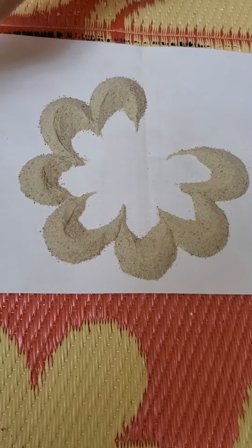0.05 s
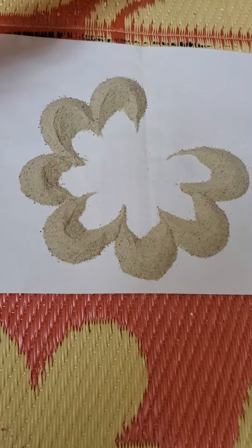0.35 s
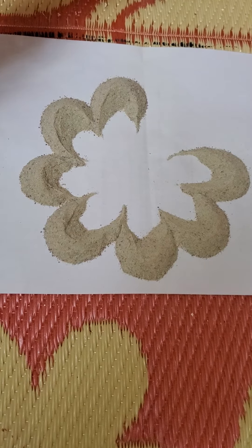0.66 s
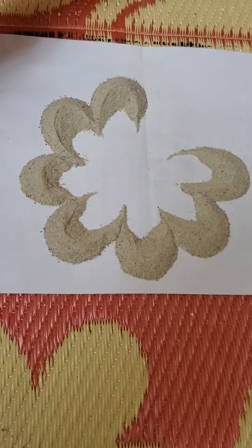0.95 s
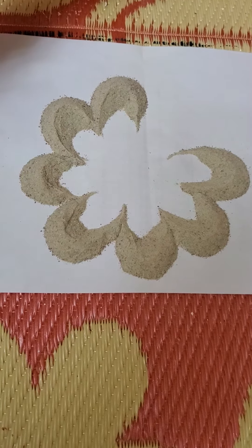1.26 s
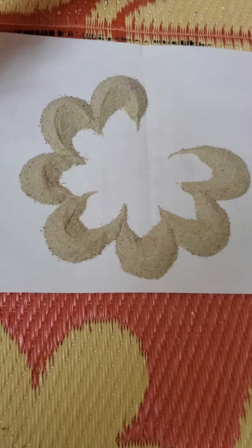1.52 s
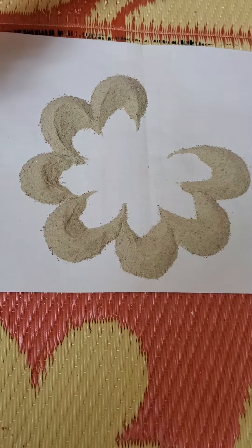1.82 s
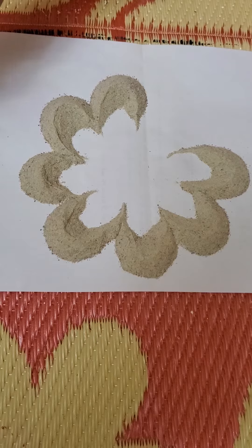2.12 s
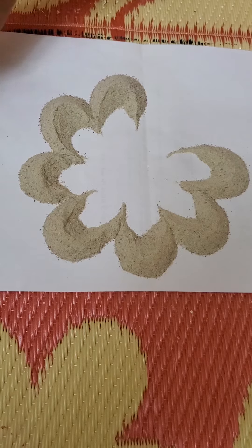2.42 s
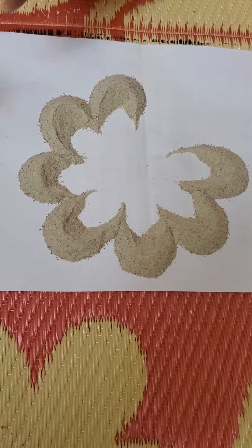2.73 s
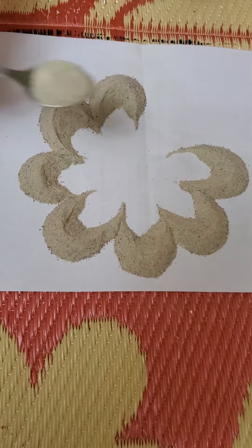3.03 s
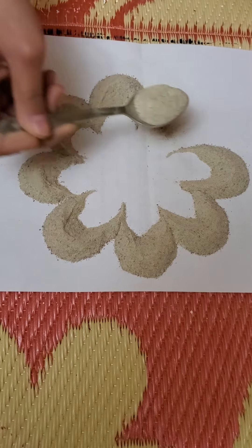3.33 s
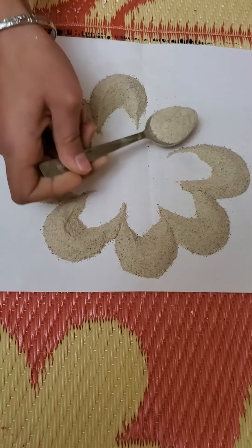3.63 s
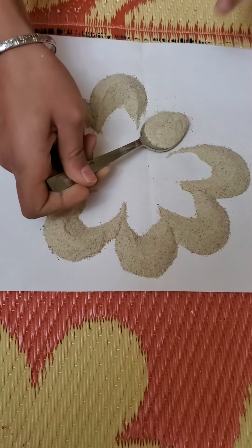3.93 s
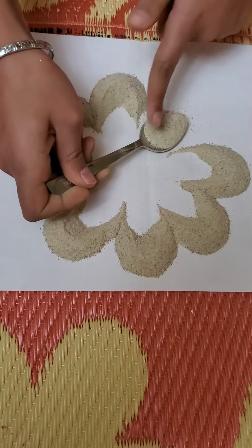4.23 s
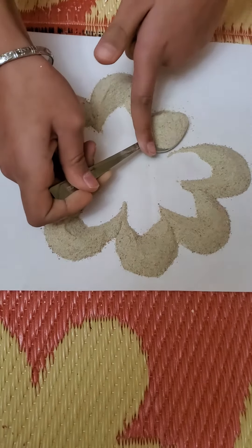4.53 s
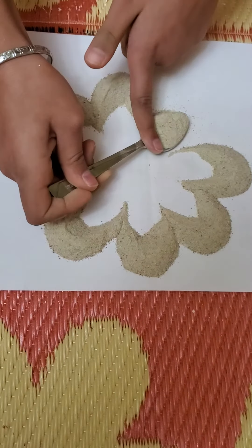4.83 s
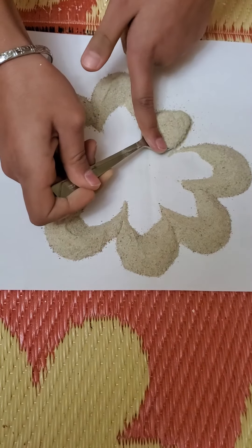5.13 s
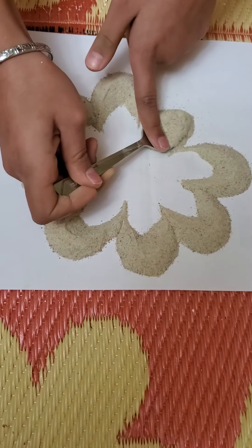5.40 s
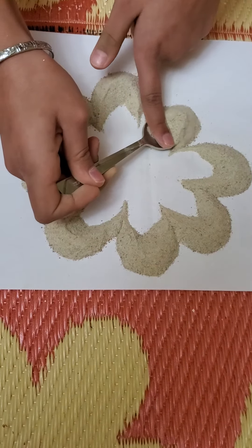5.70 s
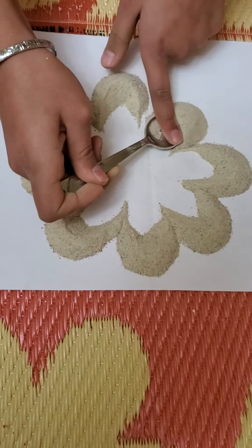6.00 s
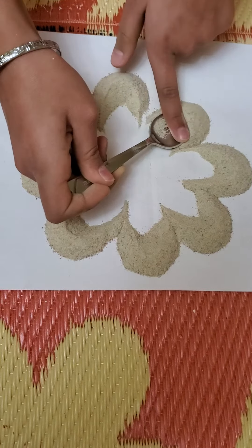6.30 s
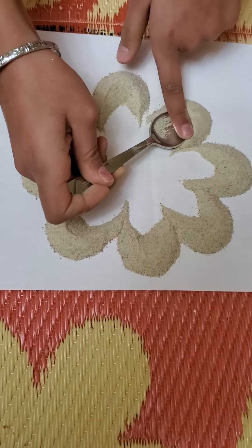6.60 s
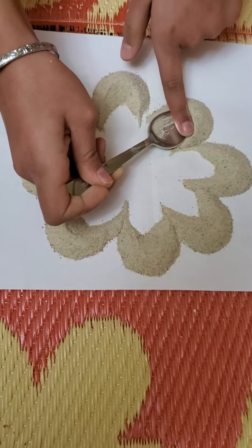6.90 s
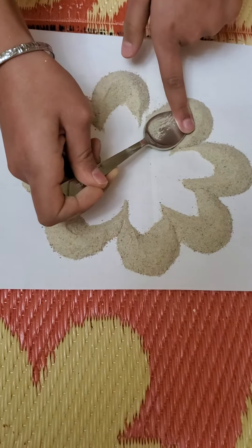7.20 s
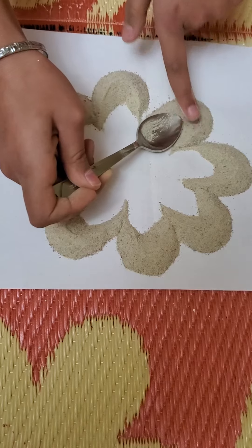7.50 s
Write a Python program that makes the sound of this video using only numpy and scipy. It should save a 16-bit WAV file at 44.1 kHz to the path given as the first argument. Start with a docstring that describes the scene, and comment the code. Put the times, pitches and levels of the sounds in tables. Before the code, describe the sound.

A steel spoon crunches through sand in a bowl, then sand spills and slides onto paper with soft hisses and ticks.

```python
"""A steel spoon digs in a bowl of fine sand: each stroke shears grains, which crunch and ring the bowl.
Something bumps and drags softly on the floor mat, and an arm brushes it. The spoon then spills sand
on a sheet of paper and a fingertip pushes the rest off it: sliding grains hiss, single impacts tick.
A bare room with a low rumble surrounds it all, heard from close by through two microphone ports."""
import sys
import numpy as np
from scipy import signal
from scipy.fft import rfft, irfft
from scipy.io import wavfile

SR = 44100
rng = np.random.default_rng(int(sys.argv[2]) if len(sys.argv) > 2 else 0)


def int16_out(signal):
    """Quantize to a 16-bit WAV file."""
    q = np.round(np.clip(np.atleast_2d(signal).T, -1, 1) * 32767)
    wavfile.write(sys.argv[1], SR, q.astype(np.int16))


N = 332955
TIME = np.arange(N) / SR

# Levels in the tables are relative; a balance is left minus right.
# noise spectrum of the still room at each port: (frequency [Hz], level [dB])
AMBIENT_LEFT = [(25, -11.5), (50, 0), (140, -2.5), (250, 1), (310, -17.5), (480, -22), (600, -15),
                (900, -27.5), (2000, -33.5), (5500, -44.5), (6900, -26.5), (8500, -43.5), (15500, -33.5)]
AMBIENT_RIGHT = [(25, -17), (50, 2.5), (250, -2.5), (420, -24), (850, -31), (1800, -16.5), (3100, -40.5),
                 (4000, -23.5), (4700, -29), (5600, -24.5), (8500, -48), (11000, -33.5), (15500, -55)]
# strength of that noise: (left level [dB], right level [dB])
AMBIENT_DB = [-64, -61.5]
# reverberation of the room: (frequency [Hz], t60 [s])
REVERB_TIMES = [(100, 0.81), (1000, 0.58), (4000, 0.39), (12000, 0.48)]
# how sound from the bowl and from the sheet divides between the ports: (frequency [Hz], balance [dB])
BOWL_BALANCE = [(60, -4.5), (200, -2), (320, -6), (480, 0.5), (750, 3.5), (1300, -0.5), (1700, -8.5),
                (2400, -3.5), (4400, -7), (6800, 5), (8500, 1.5), (10500, -4), (12500, 3.5), (15000, 16)]
PAPER_BALANCE = [(400, -14), (700, 21), (1700, -15.5), (2600, -8), (3400, -2.5), (4600, -4.5),
                 (5600, -10.5), (7000, 5.5), (9000, 8), (11000, 6), (14000, 13.5)]

# an arm brushes the mat as each hand reaches in: (time [s], duration [s], level [dB])
ARM_REACHES = [(3.139, 0.094, -69.5), (4.043, 0.09, -70), (4.277, 0.055, -72)]
# something is dragged over the mat: (time [s], duration [s], level [dB])
MAT_DRAGS = [(1.874, 0.055, -66.5), (2.193, 0.076, -73.5), (2.26, 0.088, -70.5), (2.319, 0.18, -55.5)]
# soft bumps on the mat: (time [s], thud level [dB], knock level [dB])
MAT_BUMPS = [(1.206, -43, -62), (1.247, -45.5, -66), (1.405, -43, -65), (2.323, -31.5, -44),
             (2.511, -44, -45), (3.53, -80, -52.5), (3.862, -57, -54)]
# modes of mat and floor: (frequency [Hz], level [dB], t60 [s])
MAT_MODES = [(78.5, -9, 0.4), (153.7, -3.5, 0.18), (209.7, -2, 0.13), (296, -0.5, 0.053), (424, -25, 0.071)]
# spectra of the contacts with the mat: (frequency [Hz], level [dB])
BRUSH_SPECTRUM = [(300, -14), (480, -7.5), (640, 1.5), (820, -6), (1080, -4.5), (1500, -18), (2500, -23),
                  (6000, -45)]
DRAG_SPECTRUM = [(290, -49), (500, -3.5), (880, -9), (1090, 0), (1570, -8), (2040, -3), (2810, -8),
                 (3300, 2), (3900, 0), (6800, -3.5), (8210, -19), (9490, -8), (16000, -12)]
KNOCK_SPECTRUM = [(200, -20), (700, -5), (1400, 7.5), (1750, 9.5), (3200, 1.5), (6000, -2), (15000, -34)]

# sand slides off the spoon at each jolt: (time [s], duration [s], level [dB], hiss offset [dB])
SAND_SPILLS = [(3.222, 0.015, -59, -6), (3.24, 0.098, -45, -6), (3.36, 0.064, -58.5, -9),
               (3.497, 0.026, -53, -11), (3.796, 0.095, -56, -8), (3.9, 0.11, -67.5, -8)]
# a fingertip pushes sand off the resting spoon: (time [s], duration [s], level [dB], hiss offset [dB])
FINGER_PUSHES = [(4.375, 0.043, -78.5, 1), (5.0, 0.18, -75, -3), (5.39, 0.091, -65.5, -7),
                 (5.64, 0.29, -77, -4), (5.945, 0.22, -58.5, -7.5), (6.24, 0.51, -79.5, 2.5),
                 (6.835, 0.17, -61, -4.5), (7.04, 0.06, -67, -3), (7.41, 0.12, -61.5, -4.5)]
# snaps of grains and light touches of the spoon: (time [s], level [dB], balance [dB])
SPOON_TICKS = [(3.2405, -27.5, -3), (3.246, -29, -1.5), (3.284, -28.5, -6), (3.3791, -36, 0),
               (3.8301, -28.5, -3), (3.8473, -36, 5), (3.862, -31.5, -1), (3.9234, -39, -4),
               (4.351, -46.5, -2.5), (4.4689, -55.5, -3), (4.6622, -51, 2), (4.7224, -53.5, 5),
               (4.9716, -49, -7.5), (5.3637, -41.5, 6), (5.374, -40, 1), (5.4347, -25, -2),
               (6.0045, -30, -1.5), (6.1467, -32.5, 2), (6.1693, -35.5, 1), (6.8491, -35, -6),
               (6.921, -37, -3), (6.977, -39, -9), (7.0794, -41.5, -3), (7.0993, -47, 4), (7.3255, -42, 9),
               (7.4153, -38.5, 2)]
# modes of the hand-held spoon: (frequency [Hz], level [dB], t60 [s])
SPOON_MODES = [(3882, -16, 0.027), (5627, -17.5, .025)]
# spectra of spilled sand, pushed sand, the finest grains and a tick: (frequency [Hz], level [dB])
SPILL_SPECTRUM = [(530, -52), (900, -23.5), (1360, -19.5), (1870, -12), (2470, -3.5), (3430, -9),
                  (3930, -1.5), (4720, -2), (5450, -1.5), (8020, -18.5), (9000, -18), (11700, -26),
                  (19800, -120)]
PUSH_SPECTRUM = [(710, -62), (1200, -37), (1710, -10), (3380, -10), (3870, -4), (4510, -7), (5570, 1.5),
                 (6370, -17.5), (6930, -8.5), (7600, -24), (9000, -18), (11700, -40), (19800, -120)]
HISS_SPECTRUM = [(5000, -24.5), (7000, 0), (8500, -13.5), (11000, -0.5), (16000, -1)]
TICK_SPECTRUM = [(800, -49), (2000, -27), (3200, -13.5), (4000, -7.5), (4600, -13.5), (5700, 2.5),
                 (6800, -5.5), (7600, -17), (8800, -16.5), (11200, -10), (16000, -17)]

# digs in the bowl: (time [s], duration [s], level [dB], push on the bowl [dB], brightness [dB])
DIG_STROKES = [(0.098, 0.018, -37.5, 13.5, -9.5), (0.126, 0.03, -34, -1.5, -2),
               (0.21, 0.046, -30.5, 3.5, -3), (0.28, 0.11, -33, 4.5, 3), (0.4, 0.026, -29.5, 4, -1.5),
               (0.453, 0.042, -33.5, 3.5, 0.5), (0.508, 0.038, -27.5, 4.5, -5.5),
               (0.542, 0.048, -35, -0.5, 1.5), (0.614, 0.047, -26.5, -8.5, 0),
               (0.702, 0.072, -32, -2.5, 0.5), (0.901, 0.036, -27.5, -4, 0), (0.998, 0.056, -26, -8, -0.5),
               (1.112, 0.032, -37.5, -4, -8), (1.181, 0.068, -44, -6, -2.5), (1.276, 0.006, -42.5, -4, -13)]
# light stirring around the digs: (time [s], duration [s], level [dB])
LIGHT_STIRS = [(0, 0.1, -50.5), (0.105, 0.15, -40), (0.29, 0.3, -42.5), (0.932, 0.04, -39)]
# coarse grains crack under the spoon: (time [s], level [dB])
GRAIN_CRACKS = [(0.3172, -18), (0.3623, -9.5), (0.4552, -13), (0.5786, -18), (0.6869, -14.5), (0.7669, -12),
                (0.8934, -20.5), (0.9023, -14), (0.9624, -15.5), (1.003, -10), (1.2149, -22.5)]
# the spoon meets the bowl's wall: (time [s], level [dB])
WALL_STRIKES = [(.102, 8), (.404, 3), (1.004, 5.5)]
# modes of the bowl: (frequency [Hz], level [dB], t60 [s], balance [dB])
BOWL_MODES = [(322, -6.5, 0.062, -6), (957, -9, 0.38, 10), (1035, -8.5, .3, 0.5), (1070, -4, .4, 2),
              (1148.4, -7, 0.44, -1), (1236, -4, 0.27, 1), (1568, -12, 0.24, -3), (2196, -9.5, .09, -4.5),
              (3130, -8, 0.062, 0.5), (3302, -7, 0.062, -1), (3922, -8.5, 0.13, -7.5),
              (4300, -6.5, .15, -5)]
# spectra of sheared sand and of a cracking grain: (frequency [Hz], level [dB])
CRUNCH_SPECTRUM = [(40, -23), (100, -18.5), (230, -11), (320, -3.5), (460, -11), (820, -8), (1200, 0),
                   (1700, -12), (2200, -5.5), (2700, -8.5), (4000, -3), (6200, -4.5), (8000, -15),
                   (10300, -8), (13000, -10), (16000, -19)]
CRACK_SPECTRUM = [(300, -18), (1000, -10), (1600, -15), (2300, -9), (3900, 1.5), (6000, 4), (8100, -13),
                  (10300, -5.5), (12500, -9), (16000, -9)]


def from_db(db):
    """Amplitude ratio of a level in decibels."""
    return 10 ** (np.asarray(db) / 20)


def split_db(balance_db):
    """Level difference between the ports: half is added on the left, half taken from the right."""
    return balance_db * np.array([[.5], [-.5]])


def at_hz(points, hz):
    """Interpolation of a table on a logarithmic frequency axis."""
    known, values = np.transpose(points)
    return np.interp(np.log(np.maximum(hz, 1)), np.log(known), values)


def band_filter(x, hz, kind):
    """Maximally flat low-, high- or band-pass with second-order slopes."""
    tiny_offset = 1e-12 * (-1) ** (np.arange(N) % 2)
    return signal.sosfilt(signal.butter(2, hz, kind, fs=SR, output="sos"), x + tiny_offset)


def convolve(x, impulse_response):
    """Convolution: the output of a linear system driven by x."""
    return signal.oaconvolve(np.atleast_2d(x), np.atleast_2d(impulse_response), axes=-1)[:, :N]


def response(spectrum, balance=((1, 0), (2, 0)), size=4096):
    """Minimum-phase left and right impulse responses with this spectrum and balance; mean energy 1."""
    hz = np.fft.rfftfreq(size, 1 / SR)
    db = at_hz(spectrum, hz) + split_db(at_hz(balance, hz))
    cepstrum = irfft(np.log(from_db(db)))
    cepstrum[:, 1:size // 2] *= 2   # folding the cepstrum makes the response causal
    cepstrum[:, size // 2 + 1:] = 0
    return rms_one(irfft(np.exp(rfft(cepstrum)))) / np.sqrt(size)


def rms_one(x):
    """Normalisation to rms 1."""
    return x / np.sqrt(np.mean(x ** 2) + 1e-20)


def ring(x, hz, t60):
    """Damped oscillator: a unit impulse excites a decaying sine of height about 1."""
    decay, angle = from_db(-60 / (t60 * SR)), 2 * np.pi * hz / SR
    return signal.lfilter([0, np.sin(angle)], [1, -2 * decay * np.cos(angle), decay * decay], x + 1e-18)


def ports(x, scatter_db, scatter_t60, right_lag_s=.0002):
    """Path difference and scattering: sound reaches the right port later; near reflections trail it."""
    direct = np.array([x, np.interp(TIME - right_lag_s, TIME, x)])
    decay = from_db(-120 / (scatter_t60 * SR))
    lingering_power = signal.lfilter([1 - decay], [1, -decay], x ** 2 + 1e-24)
    scatter = np.sqrt(lingering_power) * rng.standard_normal((2, N))
    return (direct + from_db(scatter_db) * scatter) / np.sqrt(1 + from_db(scatter_db) ** 2)


def clicks(times, db):
    """Impulsive excitation: one impulse for each contact."""
    out = np.zeros(N)
    samples = np.round(np.asarray(times) * SR).astype(int)
    np.add.at(out, np.clip(samples, 0, N - 1), from_db(db))
    return out


def rebounding(times, db, gap_s, loss_db, count=3):
    """Inelastic rebound: each contact is followed by ever lighter ones, at slightly uneven gaps."""
    gaps = gap_s * rng.uniform(0.95, 1.15, (len(times), count))
    delays = np.cumsum(gaps, axis=1) - gaps
    return sum(clicks(times + delays[:, k], db - loss_db * k) for k in range(count))


def grains(per_s, spread_db, max_spreads):
    """Shot noise of random contacts, many small and a few large; rms 1."""
    sizes = from_db(spread_db * np.minimum(rng.exponential(1, N), max_spreads))
    signs = rng.choice([-1, 1], N)
    return rms_one(sizes * signs * (rng.random(N) < per_s / SR))


def strays(gain, per_s, spread_db=3):
    """Random point process: lone contacts, scaled by the movement that sheds them."""
    occurs = rng.random(N) < per_s / SR
    return gain * occurs * from_db(spread_db * np.clip(rng.standard_normal(N), -2, 2))


def swell(start, length, db, rise_s, fall_db_per_s, sag_db=0):
    """Envelope of a movement: exponential growth until start, any sag over its length, then decay."""
    age = TIME - start
    attack = np.exp(-np.clip(-2 * age / rise_s, 0, 20))
    sag = sag_db * (np.clip(age / length, 0, 1) - .5)
    fall = fall_db_per_s * np.clip(age - length, 0, 1)
    return attack * from_db(db - sag - fall)


def still_room(shared_hz=420, own_db=-8):
    """Partly coherent noise: a low rumble common to both ports, under a faint hiss of their own."""
    rumble = band_filter(rng.standard_normal(N), shared_hz, "low")
    hiss = band_filter(rng.standard_normal((2, N)), shared_hz, "high")
    air = rumble + hiss + from_db(own_db) * rng.standard_normal((2, N))
    return np.array([from_db(db) * rms_one(convolve(side, response(spectrum)[0])[0])
                     for side, spectrum, db in zip(air, (AMBIENT_LEFT, AMBIENT_RIGHT), AMBIENT_DB)])


def reverberation(x, first_echo_s=0.0042):
    """Diffuse field: a tail uncorrelated between the ports, lasting longest in the bass."""
    age, tail = TIME[:SR], 0
    edges_hz = np.geomspace(40, 18000, 9)
    for low, high in zip(edges_hz, edges_hz[1:]):
        band_pass = signal.butter(2, [low, high], "band", fs=SR, output="sos")
        band = signal.sosfilt(band_pass, rng.standard_normal((2, SR)))
        tail = tail + band * from_db(-60 * age / at_hz(REVERB_TIMES, np.sqrt(low * high)))
    return convolve(x, rms_one(tail * (age > first_echo_s)) / np.sqrt(SR))


def brushing():
    """Soft friction: skin and cloth make a dull swish on the weave of the mat."""
    motion = sum(swell(*reach, rise_s=0.04, fall_db_per_s=250) for reach in ARM_REACHES)
    friction = motion * grains(per_s=3600, spread_db=2.5, max_spreads=3.9)
    return convolve(ports(friction, scatter_db=2.5, scatter_t60=.015), response(BRUSH_SPECTRUM))


def dragging():
    """Sliding friction: many tiny contacts with the woven mat merge into a faint rasp."""
    motion = sum(swell(*drag, rise_s=0.013, fall_db_per_s=300) for drag in MAT_DRAGS)
    friction = motion * grains(per_s=6800, spread_db=5.0, max_spreads=4.75)
    heard = ports(friction, scatter_db=10, scatter_t60=0.017)
    return from_db(2.0) * convolve(heard, response(DRAG_SPECTRUM, BOWL_BALANCE))


def bumps():
    """Impact excitation: a soft blow thuds in the modes of mat and floor, with a dry knock on top."""
    times, thud_db, knock_db = np.transpose(MAT_BUMPS)
    blows = rebounding(times, thud_db, gap_s=.032, loss_db=8)
    thud = sum(from_db(db) * ring(blows, hz, t60) * (-1) ** k
               for k, (hz, db, t60) in enumerate(MAT_MODES))
    heard = ports(clicks(times, knock_db), scatter_db=1.5, scatter_t60=0.019)
    knock = convolve(heard, response(KNOCK_SPECTRUM, BOWL_BALANCE))
    return thud * from_db([[-5], [-2]]) + from_db(26) * knock


def flow(moves, rise_s, fall_db_per_s, sag_db=0):
    """Envelopes of granular flow and of its fine hiss; the strongest movement sets each."""
    gains = [swell(start, length, db, rise_s, fall_db_per_s, sag_db) for start, length, db, _ in moves]
    hiss_gains = [gain * from_db(hiss_db) for gain, (*_, hiss_db) in zip(gains, moves)]
    return np.max(gains, axis=0), np.max(hiss_gains, axis=0)


def sliding(gain, hiss_gain, spectrum, per_s, spread_db):
    """Granular friction: sand rubs over steel and paper; the finest grains add a high hiss."""
    contacts = ports(grains(per_s, spread_db, max_spreads=4.16), scatter_db=7.5, scatter_t60=0.011)
    sand = from_db(1.5) * convolve(gain * contacts, response(spectrum, PAPER_BALANCE))
    hiss = from_db(5.5) * convolve(hiss_gain * contacts, response(HISS_SPECTRUM, PAPER_BALANCE))
    return sand + hiss


def ticks(stray_gain):
    """Damped ringing: a grain snaps off the rim or steel taps the sheet; the held spoon rings briefly."""
    times, db, balance_db = np.transpose(SPOON_TICKS)
    touches = rebounding(times, db, gap_s=0.013, loss_db=11.5) + strays(stray_gain, per_s=45)
    heard = ports(touches, scatter_db=-1, scatter_t60=.011)
    heard *= from_db(split_db(np.interp(TIME, np.sort(times), balance_db)))
    snaps = convolve(heard, response(TICK_SPECTRUM, PAPER_BALANCE))
    steel = sum(from_db(mode_db) * ring(touches, hz, t60) for hz, mode_db, t60 in SPOON_MODES)
    return from_db(15.0) * snaps + steel * from_db([[-5], [3]])


def sand_on_paper(floor_echo_s=.0013):
    """Granular flow: abrupt spills and gentle pushes send sand off the spoon, shedding stray ticks."""
    spill, spill_hiss = flow(SAND_SPILLS, rise_s=0.011, fall_db_per_s=223, sag_db=4)
    push, push_hiss = flow(FINGER_PUSHES, rise_s=0.11, fall_db_per_s=200)
    sheet = sliding(spill, spill_hiss, SPILL_SPECTRUM, per_s=5000, spread_db=5.0)
    sheet += sliding(push, push_hiss, PUSH_SPECTRUM, per_s=3000, spread_db=4.0)
    sheet += ticks(stray_gain=from_db(9.5) * spill + from_db(14.5) * push)
    # the left port also catches a reflection from the floor
    sheet[0] += from_db(-9.5) * np.interp(TIME - floor_echo_s, TIME, sheet[0])
    return sheet


def dig_envelopes(rise_s=0.0022, settle_s=0.0051, sag_db=1):
    """Incoherent addition: stirs and strokes sum in power, giving shear, push and treble amplitudes."""
    stirring = sum(swell(*stir, rise_s=.005, fall_db_per_s=1503) ** 2 for stir in LIGHT_STIRS)
    shear, push, bright = np.array([stirring, stirring * from_db(2.5), stirring])
    age = TIME[:SR // 4]
    for start, length, db, push_db, bright_db in DIG_STROKES:
        stroke = np.clip(age / rise_s, 0, 1) * np.exp(-np.maximum(age - length, 0) / settle_s)
        sag = sag_db * (np.clip(age / length, 0, 1) - .5)   # the sand gives way
        power = (stroke * from_db(db - sag)) ** 2
        during = int(start * SR) + np.arange(len(age))
        shear[during] += power * from_db(-bright_db)
        bright[during] += power * from_db(bright_db)
        push[during] += power * from_db(push_db) ** 2
    return np.sqrt([shear, push, bright])


def chinks(effort, low_hz=1900, high_hz=6800, t60=0.037, spread_db=5, count=420):
    """Free vibration: coarse grains grind on the steel, each with a brief pitch of its own."""
    out, age = np.zeros((2, N)), TIME[:2048]
    last_start, last_length = DIG_STROKES[-1][:2]
    for when, pitch, size, side in rng.random((count, 4)):
        at = int(when * (last_start + last_length) * SR)
        hz = low_hz + (high_hz - low_hz) * pitch
        chink = np.sin(2 * np.pi * hz * age) * from_db(-60 * age / t60 + spread_db * (2 * size - 1.5))
        out[:, at:at + len(age)] += effort[at] * chink * np.sqrt([[side], [1 - side]])
    return out


def cracking(effort):
    """Brittle fracture: coarse grains crack under the spoon, with lesser cracks at random."""
    snaps = clicks(*np.transpose(GRAIN_CRACKS)) + strays(from_db(7) * effort, per_s=49)
    heard = ports(snaps, scatter_db=5.5, scatter_t60=0.0096)
    return convolve(heard, response(CRACK_SPECTRUM, BOWL_BALANCE))


def bowl_ringing(grain_force):
    """Modal resonance: grains and strikes on the wall drive modes, each with its own balance."""
    force = grain_force + clicks(*np.transpose(WALL_STRIKES))
    return sum(from_db(db + split_db(balance_db)) * ring(force, hz, t60) / np.sqrt(t60 * SR)
               for hz, db, t60, balance_db in BOWL_MODES)


def digging(push_hz=520, bright_hz=3000):
    """Granular shear: each stroke makes a mass of grains crunch, shake the bowl and set it ringing."""
    shear, push, bright = dig_envelopes()
    contacts = grains(per_s=6000, spread_db=3.5, max_spreads=4.9)
    heard = ports(contacts, scatter_db=4.0, scatter_t60=.008)
    treble = band_filter(bright * heard, bright_hz, "high")
    middle = band_filter(shear * heard, [push_hz, bright_hz], "band")
    bass = band_filter(push * grains(per_s=3000, spread_db=1.0, max_spreads=5.4), push_hz, "low")
    grinding = from_db(0.5) * (treble - middle) + from_db(3.5) * bass + from_db(-3) * chinks(bright)
    crunch = convolve(grinding, response(CRUNCH_SPECTRUM, BOWL_BALANCE))
    return crunch + from_db(14.5) * cracking(bright) + from_db(-2.5) * bowl_ringing(shear * contacts)


def scene():
    """Superposition: bowl, mat and sheet sound directly and reverberate, over the room's rumble."""
    bowl = digging()
    mat = bumps() + dragging() + brushing()
    sheet = sand_on_paper()
    echo = reverberation(from_db(-11) * bowl + from_db(-11.5) * mat + from_db(-14.5) * sheet)
    return bowl + mat + sheet + echo + still_room()


def record(dry):
    """Band limiting: a steep elliptic low-pass cuts the treble above 16 kHz."""
    return signal.sosfilt(signal.ellip(12, .1, 80, 16000, fs=SR, output="sos"), dry)


dry = scene()
out = record(dry)
int16_out(out)
```